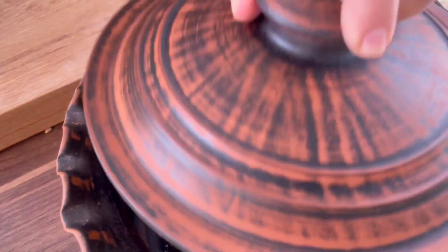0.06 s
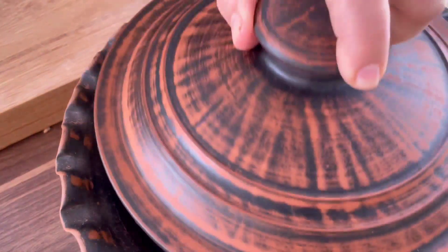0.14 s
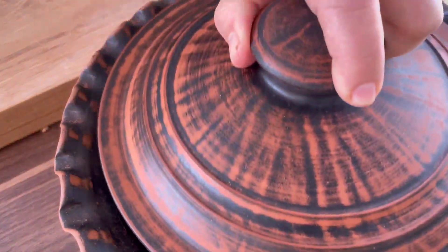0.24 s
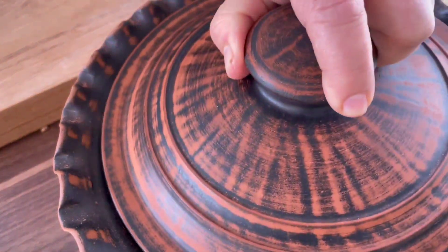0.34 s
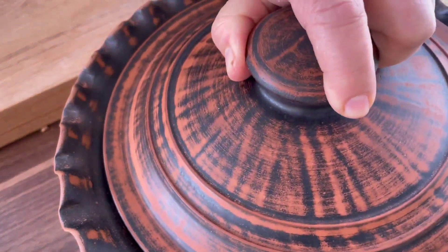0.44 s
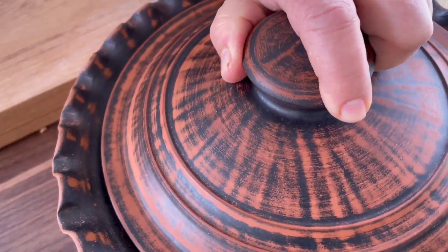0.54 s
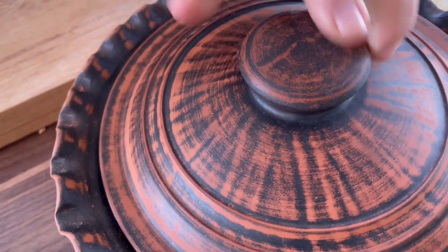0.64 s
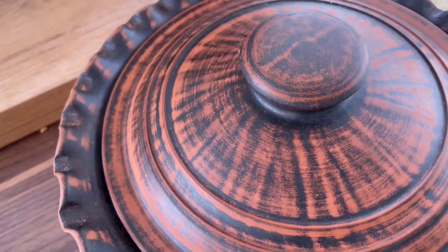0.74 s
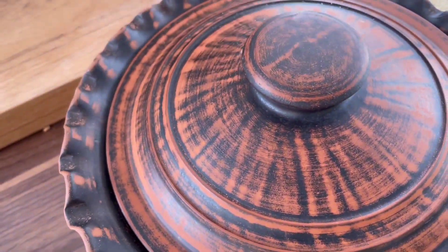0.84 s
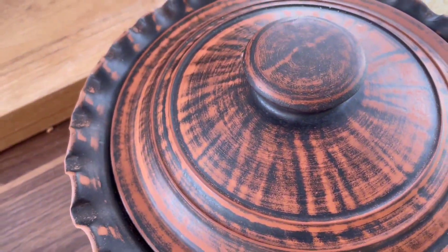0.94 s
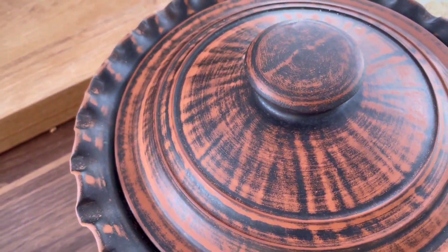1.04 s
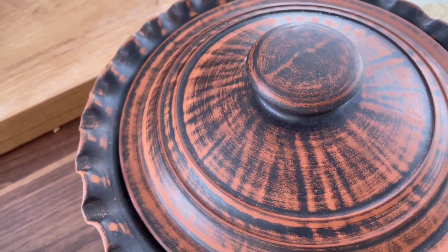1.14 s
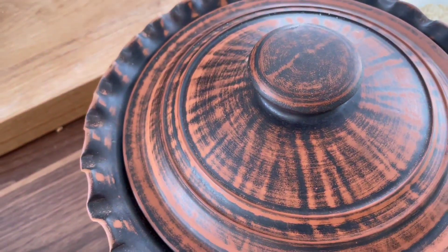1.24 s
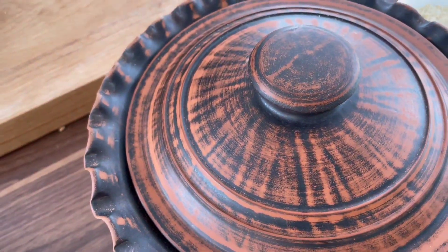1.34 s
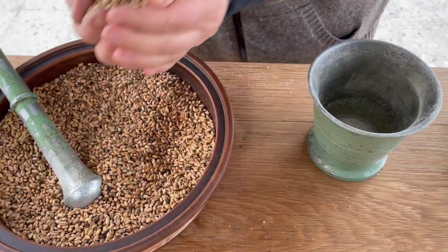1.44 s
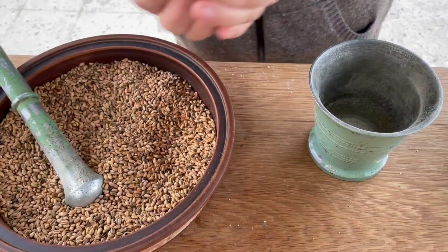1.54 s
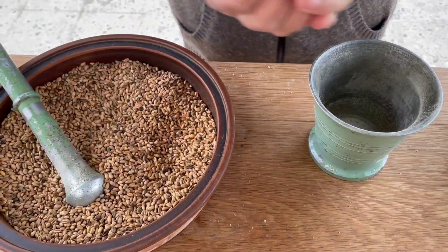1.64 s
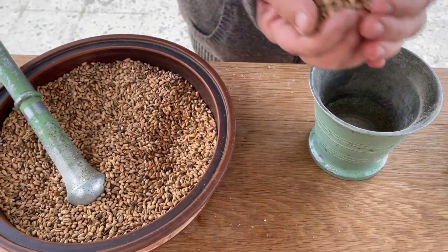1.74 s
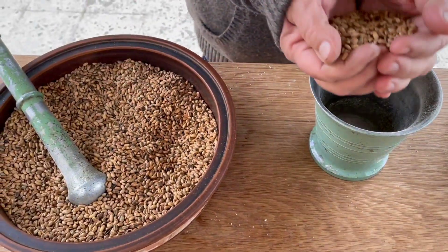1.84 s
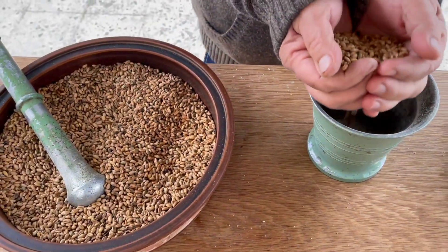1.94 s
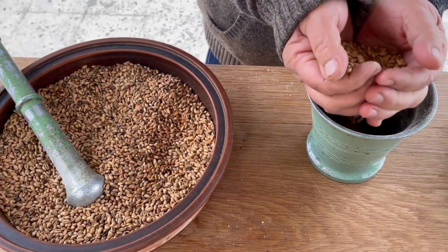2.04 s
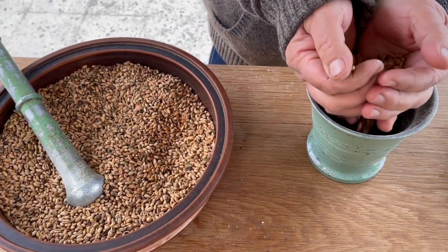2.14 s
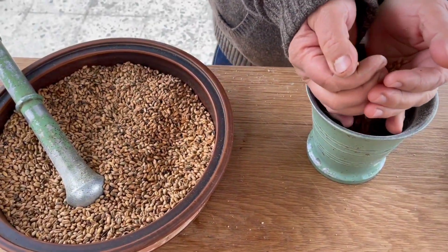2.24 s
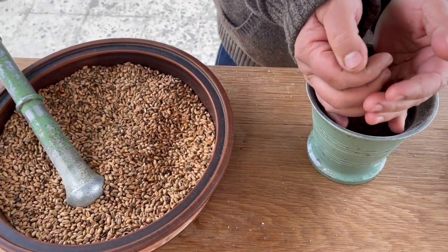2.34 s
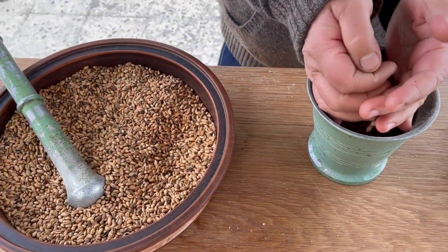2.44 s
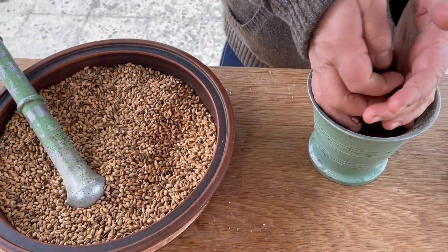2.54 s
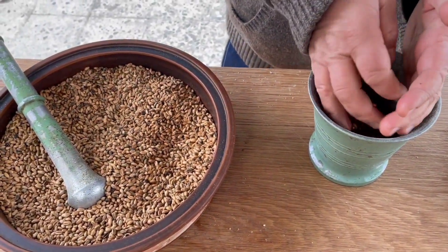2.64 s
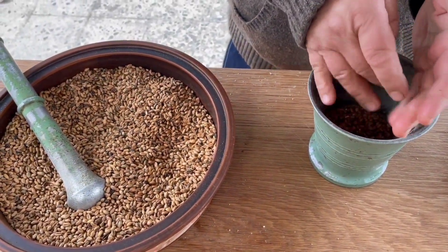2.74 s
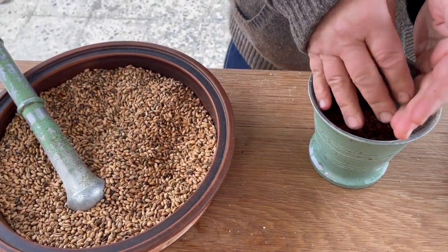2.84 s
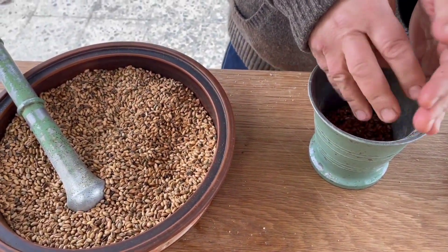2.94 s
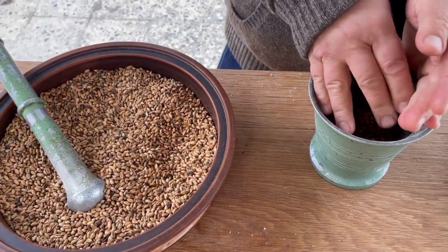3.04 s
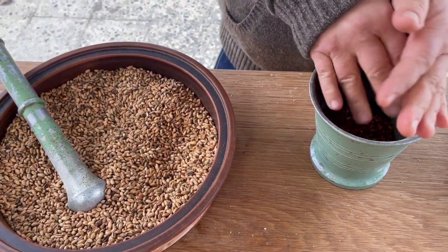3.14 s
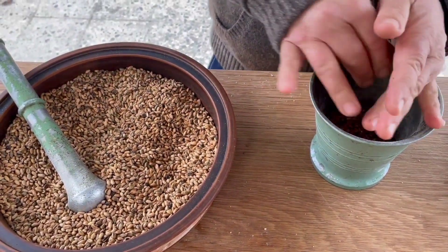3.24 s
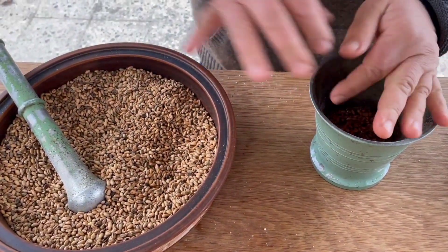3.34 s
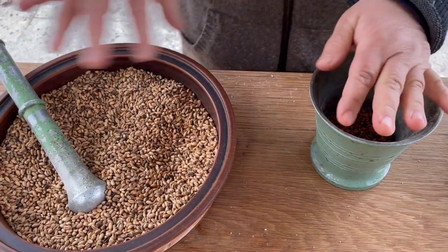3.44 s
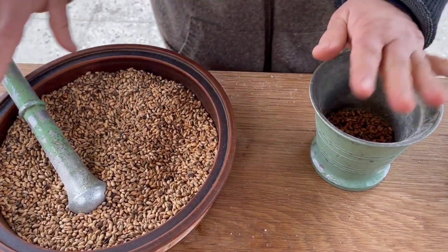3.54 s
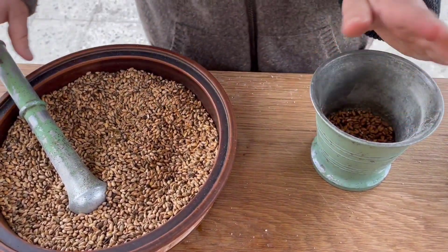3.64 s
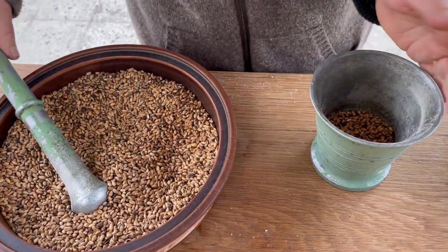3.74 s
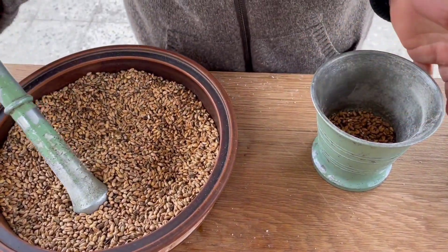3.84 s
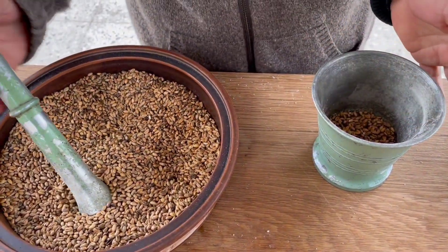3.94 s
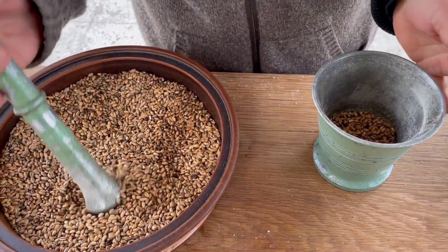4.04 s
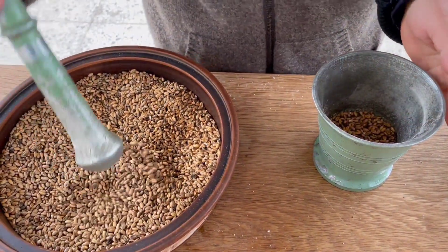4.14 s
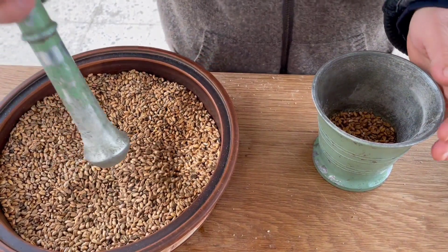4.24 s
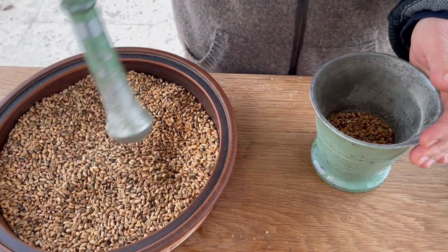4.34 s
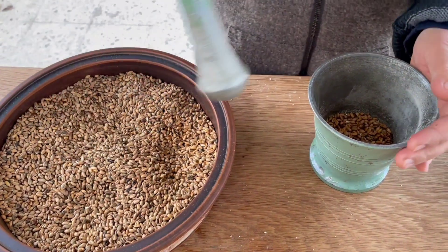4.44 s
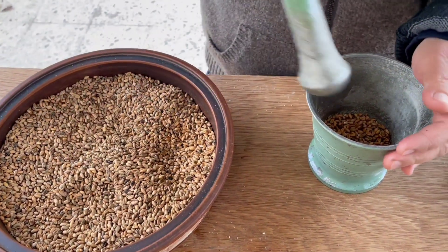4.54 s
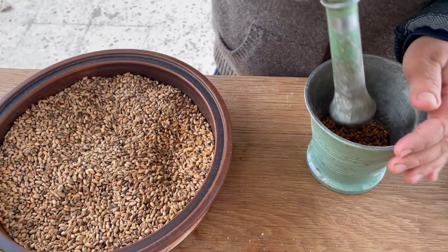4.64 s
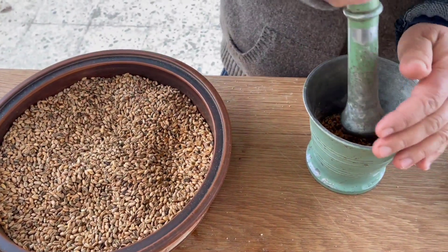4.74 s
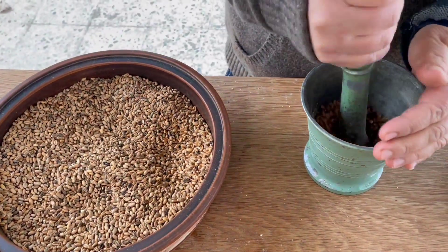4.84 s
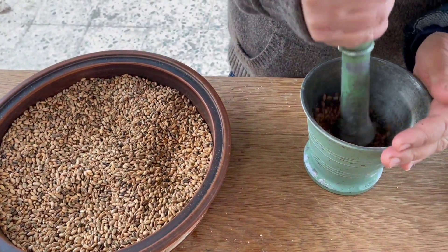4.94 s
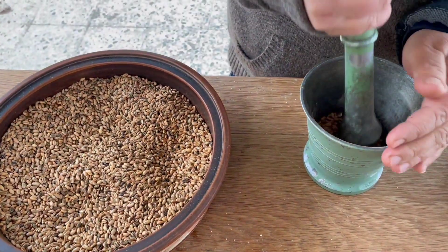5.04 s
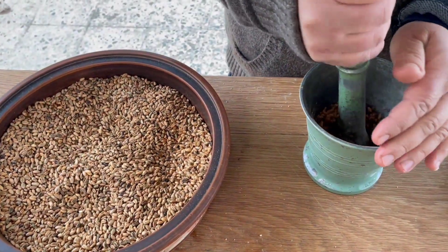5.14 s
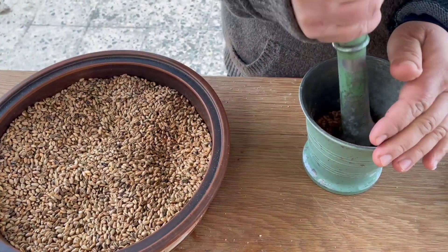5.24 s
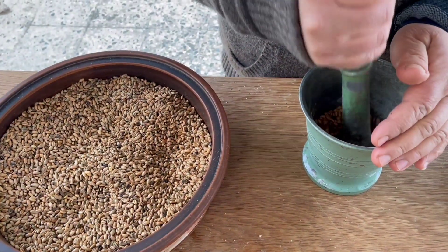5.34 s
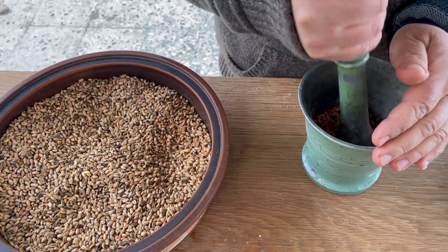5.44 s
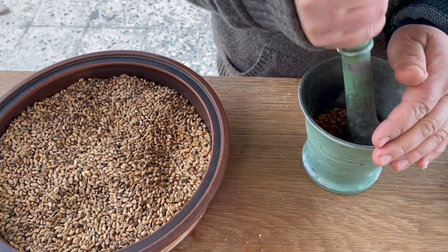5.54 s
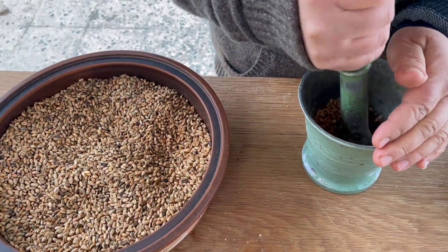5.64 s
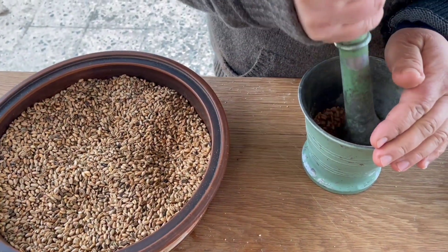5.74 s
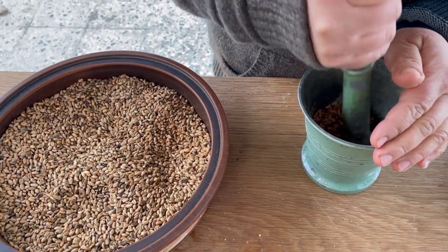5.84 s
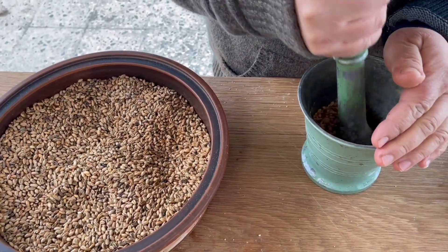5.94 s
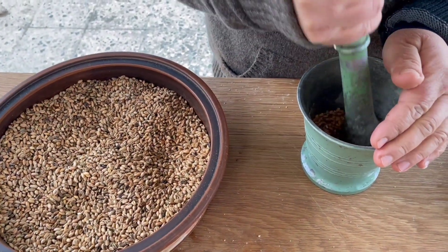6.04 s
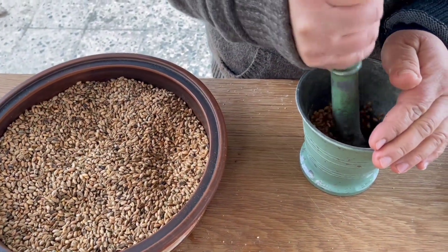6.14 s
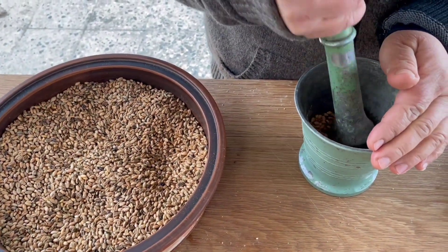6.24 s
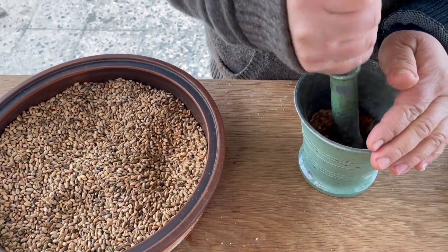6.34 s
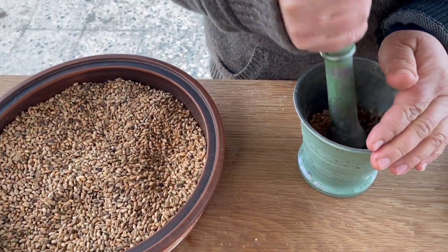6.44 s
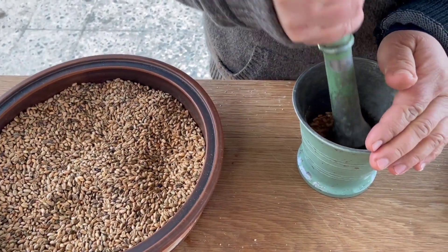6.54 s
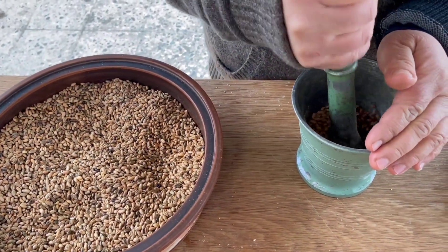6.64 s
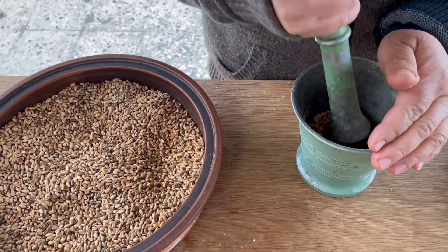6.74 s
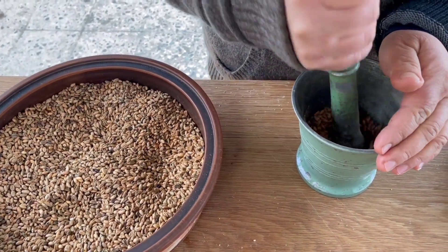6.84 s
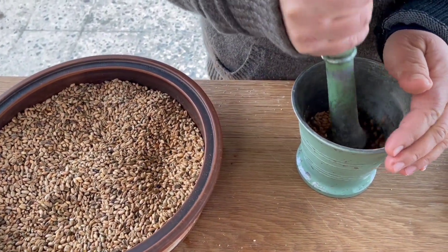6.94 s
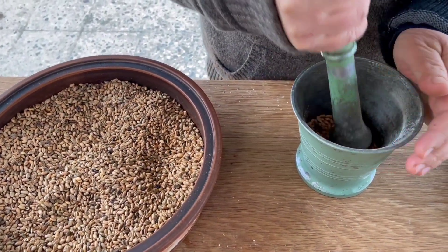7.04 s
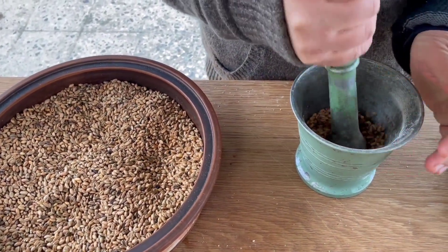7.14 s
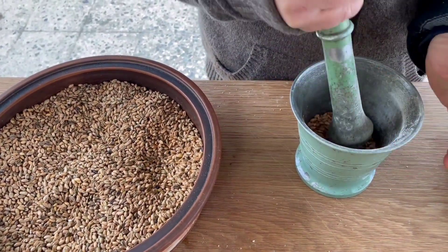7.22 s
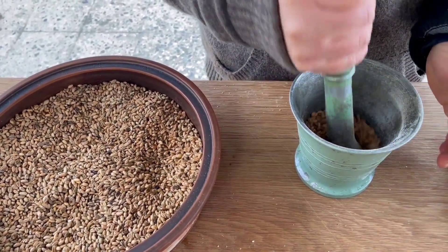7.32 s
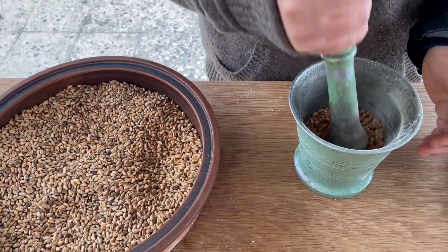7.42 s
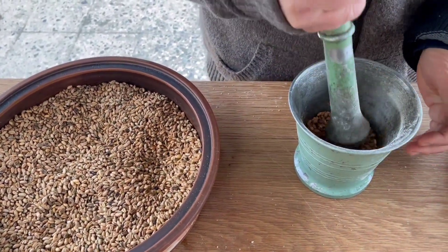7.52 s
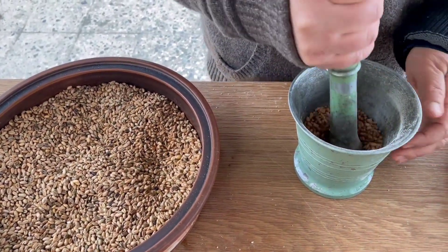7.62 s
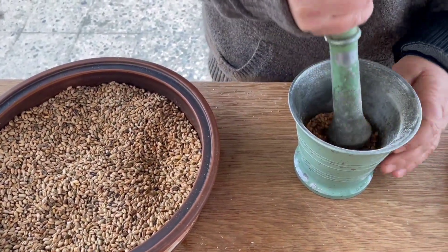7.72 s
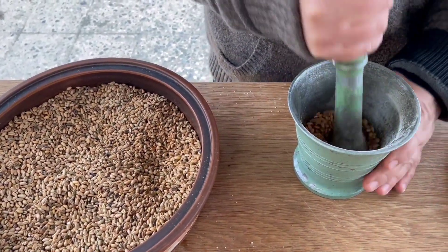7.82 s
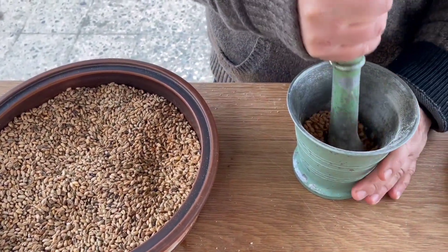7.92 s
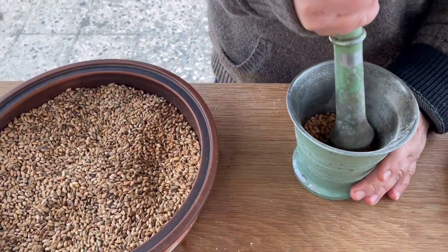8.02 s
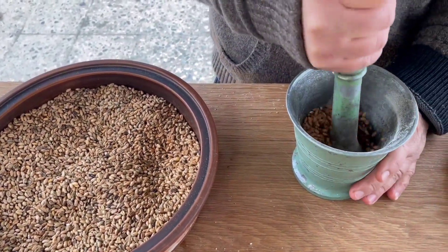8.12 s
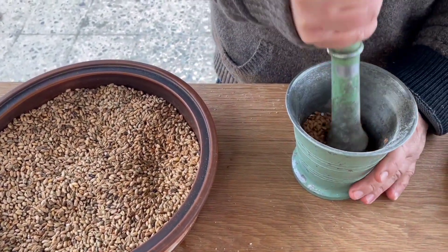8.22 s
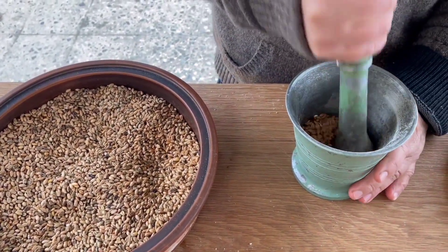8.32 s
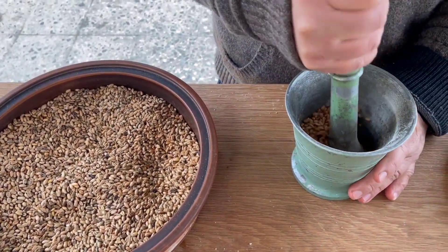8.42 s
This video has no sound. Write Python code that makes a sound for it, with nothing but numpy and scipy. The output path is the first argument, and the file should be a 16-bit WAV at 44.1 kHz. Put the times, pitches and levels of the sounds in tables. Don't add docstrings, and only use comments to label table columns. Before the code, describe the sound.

A clay lid clatters onto its pot, grain patters into a small metal mortar, then a pestle pounds steadily while birds sing outdoors.

```python
import sys
import numpy as np
from scipy import signal
from scipy.fft import rfft, irfft
from scipy.io import wavfile
from scipy.ndimage import uniform_filter1d

SR = 44100
rng = np.random.default_rng(int(sys.argv[2]) if len(sys.argv) > 2 else 0)


def boost(x):
    u = np.asarray(x, float) / 20
    return 10 ** u


def generate_wav(signal):
    frames = np.transpose(np.atleast_2d(signal))
    scaled = np.clip(frames, -1, 1) * 32767
    pcm = np.round(scaled).astype(np.int16)
    wavfile.write(sys.argv[1], SR, pcm)


N = 373960
TIME = np.arange(N) / SR

MORTAR_HZ = [1733, 3950, 9900, 10800, 11900, 12660, 12810, 13400, 13700, 14340]
# frequency in Hz, level in dB per Hz.
KERNEL = [(290, -40), (500, -3), (1020, -10), (2190, -5), (2570, -4), (3540, -5), (6610, -12.5),
          (8450, -20.5), (9770, -9), (13100, -0.5), (16000, -19.5)]
# frequency in Hz, level in dB per Hz.
WOOD = [(60, -21.5), (150, 4), (320, 7), (700, -7), (1100, -14), (1600, -34), (4000, -55.5)]


def evened(x):
    return x / np.sqrt(np.mean(x ** 2) + 1e-20)


def read(points, hz):
    f, value = np.transpose(points)
    return np.interp(np.log(hz + 1), np.log(f + 1), value)


def curve(rows, column=1):
    rows = np.array(rows)
    return np.interp(TIME, rows[:, 0], rows[:, column])


def add(mix, s, sound):
    part = mix[round(s * SR):][:len(sound)]
    part += sound[:len(part)]


def colour(x, spectrum):
    gain_db = np.maximum(read(spectrum, abs(np.fft.fftfreq(4096, 1 / SR))), -90)
    log_gain = np.log(boost(gain_db))
    taps = np.fft.ifft(np.exp(np.conj(signal.hilbert(log_gain)))).real[:2048]
    return signal.oaconvolve(x, taps / np.linalg.norm(taps))[:len(x)]


def ring(modes, contact_s, chatter_s=0.00028, detune=0.):
    t = np.arange(SR // 3) / SR
    hz, db, t60 = np.transpose(modes)[:, :, None]
    luck = rng.standard_normal((2, *hz.shape))
    db = db + 2.2 * luck[0]
    hz = hz * (1 + detune * luck[1])
    x = (boost(db - 60 * t / t60) * np.sin(2 * np.pi * hz * t)).sum(0)
    contact = rng.standard_normal(1500) * np.exp(-t[:1500] / chatter_s)
    x = signal.fftconvolve(x * (1 - np.exp(-t / contact_s)), contact)
    return x / abs(x).max()


def noise(spectrum, size, patchy_db, flicker_db):
    # frequency in Hz, coherence from -1 to 1.
    likeness = [(100, 0.92), (400, 0.47), (1500, 0.055), (12000, 0.24)]
    frames, hz = 4 * N // size + 5, np.fft.rfftfreq(size, 1 / SR)
    a, b, c, d, patches = rng.standard_normal((frames, len(hz), 5)).T
    patches = evened(uniform_filter1d(uniform_filter1d(patches, 7, 0), 9, 1))
    flicker = evened(uniform_filter1d(rng.standard_normal(frames), 3))
    same = np.clip(read(likeness, hz), -1, 1)[:, None]
    left = a + 1j * b
    right = same * left + np.sqrt(1 - same ** 2) * (c + 1j * d)
    level_db = read(spectrum, hz)[:, None] + patchy_db * patches + flicker_db * flicker
    z = np.array([left, right]) * boost(level_db)
    return evened(signal.istft(z, nperseg=size, noverlap=3 * size // 4)[1][:, :N])


def clicks(per_s, spread_db):
    size = boost(spread_db * np.minimum(rng.exponential(1, N), 4)) * rng.choice([-1., 1.], N)
    return evened(size * (rng.random(N) < per_s / SR))


def metal(damping, tilt):
    # level in dB, t60 in seconds.
    mortar = [(-31, 0.63), (-30, 0.3), (-19, 0.23), (-6, .08), (-3, 0.08), (14, 0.16), (-8, 0.088),
              (-8, 0.062), (-8, 0.12), (-4, 0.12)]
    return [(hz, db * tilt, t60 * damping) for hz, (db, t60) in zip(MORTAR_HZ, mortar)]


def pestle():
    # time in seconds, thud peak in dB, crunch in dB,
    # mortar ring in dB, pitch of the thud in Hz.
    blows = [(4.879, -13, -27.5, -21.5, 355), (5.141, -15, -31.5, -29, 329), (5.393, -18, -32, -25, 268),
             (5.633, -13.5, -31.5, -34, 329), (5.887, -15.5, -28.5, -30, 261),
             (6.129, -13, -29.5, -31, 250), (6.376, -13.5, -30.5, -16, 271), (6.636, -13, -31, -21.5, 269),
             (6.885, -12, -29.5, -24, 259.7), (7.124, -20.5, -34.5, -23.5, 332),
             (7.394, -17.5, -30.5, -20, 335), (7.655, -16, -30.5, -23.5, 253),
             (7.903, -16, -30, -15.5, 280), (8.162, -13, -29, -22.5, 201), (8.405, -11.5, -27, -22.5, 350)]
    touches = [4.839, 5.104, 5.352, 5.595, 5.855, 6.095, 6.345, 6.597, 6.847, 7.087, 7.352, 7.608, 7.859,
               8.124, 8.376]
    # time in seconds, peak in dB, low ring in Hz,
    # upper ring in Hz, upper over low in dB.
    feet = [(4.88, -14, 579, 907, 1), (5.142, -25.5, 530, 880, 3), (5.391, -22.5, 503, 895, 1),
            (5.633, -23.5, 646, 890, 1), (5.886, -20, 571, 830, 0), (6.126, -20, 505, 810, 0.5),
            (6.375, -18, 649, 880, -1.5), (6.637, -20, 558, 950, 2), (6.885, -16, 563, 966, 1),
            (7.126, -27, 640, 958, -1), (7.389, -21, 623, 956, 2.5), (7.648, -25, 635, 872, 0),
            (7.902, -23.5, 573, 867, 0), (8.157, -11, 727, 882, -0.5), (8.403, -14, 580, 852, 0)]
    # frequency in Hz, level in dB, t60 in seconds.
    table = [(130.9, -15.5, 0.46), (173.3, -11.5, 0.25), (259, -5.5, 0.13), (355.7, -3.5, 0.087)]
    # time in seconds, level in dB.
    hums = [(4.885, -40), (5.15, -36), (5.89, -31.5), (6.135, -32), (6.385, -33.5), (7.395, -32.5),
            (8.165, -39), (8.41, -38)]
    # time in seconds, level in dB.
    bursts = [(4.879, -34.5), (5.129, -39), (5.392, -34), (5.888, -22.5), (6.127, -28), (6.378, -23),
              (6.386, -18), (6.631, -35), (6.638, -24.5), (6.886, -24.5), (7.125, -27.5), (7.389, -29),
              (7.65, -29), (7.878, -36), (7.902, -32), (8.145, -34), (8.159, -40), (8.402, -33),
              (8.408, -23), (8.418, -28.5)]
    # frequency in Hz, level in dB per Hz.
    grind_spectrum = [(300, -25), (550, 0), (1000, -1), (1350, -14), (3000, -36)]
    hand_off_s, held_damping = 7.0, 0.3
    foot_t60 = 0.042
    cup_air = (1493, -6.5, 0.023)
    out, push, rub, snaps, grind = np.zeros((5, N))
    for start, (s, db, crunch_db, ring_db, hz) in zip(touches, blows):
        depth = (TIME - start) / (s - start)
        push_db = crunch_db - 14.0 + 10.5 * np.minimum(depth, 1) - 1500 * np.maximum(TIME - s, 0)
        push += boost(push_db) * np.clip(6 * depth, 0, 1)
        rise_db, fall_db = 670 * np.maximum(s + 0.0036 - TIME, 0), 294 * np.maximum(TIME - s - .004, 0)
        rub += boost(db - 12.0 - rise_db - fall_db)
        add(out, s, boost(db - 8.0) * ring(table, 0.009, detune=0.034))
        add(out, s, boost(db - 6.0) * ring([(hz, 0, 0.081)], 0.015))
        damping = 0.96 if s > hand_off_s else held_damping
        add(out, s, boost(ring_db - 0.5) * ring(metal(damping, 0.9), 0.00033))
    for s, db, low_hz, upper_hz, upper_db in feet:
        base = [(low_hz, 0, foot_t60), (upper_hz, upper_db, foot_t60), cup_air, (MORTAR_HZ[0], -32, .25)]
        add(out, s - .003, boost(db - 2.5) * ring(base, .0025, chatter_s=.0001))
        rise_db, fall_db = 1000 * np.maximum(s + .005 - TIME, 0), 900 * np.maximum(TIME - s - .005, 0)
        grind += boost(db - 15. - rise_db - fall_db)
    for s, db in hums:
        add(out, s, boost(db) * ring([(467, 0, 0.25)], 0.0048, detune=0.0093))
    for s, db in bursts:
        add(snaps, s, boost(db + 18.5) * np.array([1, -.5, .3]))
    crunch = colour(push * clicks(9000, 3.9) + snaps, KERNEL)
    shudder = colour(rub * rng.standard_normal(N), WOOD)
    return out + crunch + shudder + colour(grind * clicks(2500, 3.), grind_spectrum)


def lift():
    lift_s, lift_db = 4.013, -28
    heap = boost(lift_db - 11.0 - 330 * abs(TIME - lift_s)) * rng.standard_normal(N)
    heap[round(lift_s * SR)] += boost(lift_db + 20)
    return colour(heap, [(300, -18), (700, 5.5), (1000, -10.5), (2000, -15.0), (4000, -69.5)])


def lid():
    # time in seconds, peak in dB, low clay rings in dB, high in dB.
    knocks = [(0.145, -4.5, -16.5, -16), (0.156, -6, -35, -43), (0.187, -6.5, -17.5, -27),
              (0.21, -31, -40, -31), (0.224, -23.5, -40, -29.5), (0.275, -15.5, -52, -53),
              (0.296, -8, -19, -46), (0.34, -17.5, -28, -45), (0.364, -3.5, -10.5, -28.5),
              (0.388, -26, -33, -36), (0.414, -17, -42, -45)]
    # time in seconds, peak in dB, pitch in Hz.
    bumps = [(.6, -36.5, 720), (0.642, -31, 297), (0.699, -14, 328), (.706, -11, 200), (0.758, -19.5, 277),
             (.772, -20.5, 130), (0.8, -28, 256), (.85, -30.5, 109), (.912, -35.5, 100), (1.007, -13, 600),
             (1.014, -16, 241), (1.024, -15.5, 567), (1.04, -25, 329), (1.06, -29, 470),
             (1.332, -31.5, 293), (1.364, -29, 600)]
    # frequency in Hz, level in dB, t60 in seconds.
    clay = [(650, -2, .22), (754, -11, .08), (888, 1, .12), (1087, -2, .07), (1160, -8, .07),
            (1410, -11, .22), (1604, 0, .09), (1733, -8, .15), (2326, -15, .08)]
    # frequency in Hz, level in dB, t60 in seconds.
    rim = [(2850, -7, .05), (2965, -2, .12), (3150, -8, .05), (3400, -2, .09), (3590, -5, .07),
           (3850, -6, .04), (4175, -3, .07), (4345, -7, .1), (4535, -1, .1), (4860, -7, .05),
           (5600, -14, .05)]
    # frequency in Hz, level in dB, t60 in seconds.
    board = [(123.7, -16, 0.38), (164.6, -8, 0.11), (352, -7.5, 0.0306), (450, -7.5, 0.014)]
    first_thump_hz, sink_hz_per_s = 317.8, 568
    muted_clay_db, muted_rim_db = -22, -46
    gripped_until_s = .18
    swish_end_s, swish_db = 0.166, -54.5
    out, grate, rub, bite = np.zeros((4, N))
    first_s, last_s = knocks[0][0], knocks[-1][0]
    strikes = [(*row, first_thump_hz - sink_hz_per_s * (row[0] - first_s)) for row in knocks]
    strikes += [(s, db, db + muted_clay_db, db + muted_rim_db, hz) for s, db, hz in bumps]
    for s, db, clay_db, rim_db, hz in strikes:
        seated_db = -6 * (s > last_s)
        modes = clay
        if s > last_s:
            modes = clay[:2]
        elif s < gripped_until_s:
            modes = clay[:5]
        thump = (hz, 0, min(.13, 24 / hz))
        add(out, s, boost(db) * ring(board + [thump], 0.0015, chatter_s=0.00043))
        add(out, s, boost(clay_db - 1.5) * ring(modes, 0.00012, chatter_s=.0003, detune=.006))
        add(out, s, boost(rim_db + 3) * ring(rim, .0001, chatter_s=.006, detune=.004))
        after = np.maximum(TIME - s, 0)
        grate += (boost(rim_db - 13.0) + boost(clay_db - 15.0)) * boost(-900 * after) * (after > 0)
        add(bite, s, boost([clay_db + 9.5 + seated_db]))
        rub += boost(db - 14.5 + seated_db - 426 * after) * (after > 0)
    grate = colour(grate * rng.standard_normal(N) + bite,
                   [(300, -15.5), (900, 11.5), (2200, -11.0), (4500, -6.0), (5500, -46), (9000, -37)])
    swish = boost(swish_db) * (TIME < swish_end_s) * rng.standard_normal(N)
    out = signal.sosfilt(signal.butter(4, 5200, fs=SR, output="sos"), out)
    out += colour(swish, [(2500, -27), (5500, -4), (9500, 9), (11000, -39)])
    return out + grate + colour(rub * rng.standard_normal(N), WOOD)


def grain():
    # time in seconds, patter in dB.
    pour = [
        (1.96, -68),
        (1.99, -58),
        (2.08, -55),
        (2.24, -44.5),
        (2.4, -56),
        (2.8, -64.5),
        (3.17, -61),
        (3.4, -73),
    ]
    # time in seconds, peak in dB.
    drops = [
        (1.983, -36.5),
        (2.829, -23.5),
        (3.043, -31),
    ]
    # start in seconds, length in seconds, patter in dB.
    rubs = [
        (0, 0.15, -69),
        (0.206, 0.011, -41.5),
        (0.337, 0.1, -62),
        (0.568, 0.1, -59.5),
        (1.324, 0.056, -55),
        (3.326, 0.021, -57.5),
        (3.94, 0.24, -56.5),
        (8.417, .1, -46),
        (4.712, 4.5, -61.5),
    ]
    # frequency in Hz, level in dB, t60 in seconds.
    bare_modes = [(3950, -17, .12), (7600, -12, .08), (10000, -5, .05), (11950, -2, .055), (12700, -4, .04),
                  (13300, 0, .07), (13650, -1, .08)]
    bare_s, filled_s = 1.984, 0.15
    level = boost(curve(pour)) * (TIME > pour[0][0]) * (TIME < pour[-1][0])
    for s, length, db in rubs:
        outside_s = np.maximum(np.maximum(s - TIME, TIME - s - length), 0)
        level += boost(db - 454 * outside_s)
    out = colour(level * clicks(6000, 4.0), KERNEL)
    bare = boost(19.0 - 12 * (TIME - bare_s) / filled_s) * (TIME > bare_s)
    ping = ring(metal(0.32, 0.98), .0001, chatter_s=.0001)
    out += signal.oaconvolve(level * bare * clicks(900, 3.5), ping / np.linalg.norm(ping))[:N]
    for s, db in drops:
        add(out, s, boost(db) * ring(bare_modes, .0001, chatter_s=.0002))
    return out


def ports(x, lean):
    # frequency in Hz, side minus mid in dB.
    side_spectrum = [(60, -17), (130, -24), (290, -13.5), (640, 1), (1410, -5), (3100, -15), (6820, 7.5),
                     (15000, -9)]
    flip_hz = [700, 3000, 8400]
    hz = np.fft.rfftfreq(N, 1 / SR)
    lead = (-1.) ** np.searchsorted(flip_hz, hz)
    bounce = rng.standard_normal(900) * boost(-60 * np.arange(900) / SR / .02)
    scattered = boost(-3.) * signal.oaconvolve(x, bounce / np.linalg.norm(bounce))[:N]
    shifted = 1j * lead * boost(read(side_spectrum, hz)) * rfft(0.83 * x + scattered)
    side = irfft(shifted, N) + lean * x
    return x + side * np.array([[1], [-1]])


def whistle(start, length, from_hz, to_hz, db, slide_s, tremble_hz=22):
    attack_s, release_s, swell_db = 0.0084, 0.018, 1
    t = np.arange(0, length, 1 / SR)
    tremble = evened(uniform_filter1d(rng.standard_normal(len(t)), 300))
    hz = from_hz + (to_hz - from_hz) * np.minimum(t / slide_s, 1)
    hz = uniform_filter1d(hz, 300, mode="nearest")
    turns = np.cumsum(hz + tremble_hz * tremble) / SR
    shape = np.minimum(np.minimum(t / attack_s, (length - t) / release_s), 1) * boost(swell_db * t / length)
    return start, np.sqrt(2) * boost(db) * shape * np.sin(2 * np.pi * turns)


def trill(start, end, low_hz, high_hz, per_s, db):
    t = np.arange(0, end - start, 1 / SR)
    jitter = .04 * evened(uniform_filter1d(rng.standard_normal(len(t)), 400))
    beat = (t * per_s + jitter) % 1
    sweep = np.minimum(beat / 0.45, 1)
    swell = np.sin(np.pi * sweep)
    turns = np.cumsum(low_hz + (high_hz - low_hz) * sweep) / SR
    return start, boost(db + 9.5) * swell * np.sin(2 * np.pi * turns)


def yard(x):
    t = np.arange(SR) / SR
    taps = rng.choice([-1., 1.], (2, SR)) * (rng.random((2, SR)) < .05)
    taps = taps * boost(-60 * t / .8) * (t > .006)
    return signal.fftconvolve(x[None], taps / np.linalg.norm(taps[0]), axes=1)[:, :N]


def birds():
    # start in seconds, length in seconds, from Hz, held Hz, dB.
    flute = [(1.215, 0.115, 2050, 2045, -45), (1.1, 0.138, 1740, 1715, -54), (1.06, 0.039, 1870, 1860, -55),
             (.87, .06, 2100, 2300, -55), (0.9, .07, 2200, 2150, -55), (1.503, 0.23, 2080, 2290, -48),
             (1.72, 0.2, 2250, 2040, -49), (1.58, 0.13, 2500, 2620, -54), (1.375, 0.047, 2850, 2880, -51),
             (1.08, 0.084, 4150, 4200, -59), (1.2, .1, 4380, 4400, -60), (3.32, .13, 2450, 2200, -60),
             (2.52, 0.11, 3050, 3150, -55), (2.159, 0.24, 1900, 1735, -46), (2.219, 0.13, 2300, 2285, -48),
             (2.58, 0.091, 1980, 2430, -41), (2.851, 0.07, 2050, 1750, -42),
             (3.073, .18, 2180, 1960, -37.5), (3.32, 0.175, 2150, 1960, -39.5),
             (3.717, 0.147, 2750, 1770, -41.5), (4.176, 0.077, 2380, 2620, -42.5),
             (4.224, 0.091, 2780, 2070, -41.5), (4.482, 0.067, 2280, 2070, -41.5),
             (5.046, 0.14, 2110, 2060, -51), (5.098, 0.25, 4650, 4400, -58), (5.368, 0.11, 2600, 2830, -52),
             (5.26, .1, 1700, 2050, -53), (2.86, 0.087, 2500, 2150, -56), (5.73, 0.11, 2050, 1790, -50),
             (5.899, 0.093, 2900, 2650, -49), (5.52, 0.206, 2440, 2330, -54),
             (5.957, 0.183, 2030, 2060, -51), (7.259, 0.097, 1910, 2150, -43),
             (7.432, 0.088, 1990, 1787, -43.5)]
    # start in seconds, length in seconds, from Hz, to Hz, dB.
    slides = [(1.288, 0.12, 7530, 8000, -57.5), (1.48, 0.069, 7740, 7700, -61.5),
              (1.9, 0.063, 2020, 2396, -52), (1.097, 0.09, 1910, 2500, -54),
              (2.466, 0.031, 2600, 2830, -43.5), (2.488, 0.099, 2825, 1943, -37.5),
              (2.912, 0.04, 1750, 1470, -47.5), (3.589, 0.069, 2768, 2300, -40),
              (4.875, 0.072, 5760, 4970, -47.5), (5.016, 0.091, 5970, 4710, -48.5),
              (5.208, 0.091, 2564, 2260, -49), (5.36, 0.12, 6300, 6400, -61), (5.149, .09, 2056, 2270, -53),
              (6.222, 0.089, 2545, 1850, -48), (6.64, 0.12, 2485, 2087, -47.5),
              (7.585, 0.045, 2620, 3240, -48.5), (7.687, 0.071, 2392, 1866, -38.5),
              (7.861, 0.22, 2887, 2145, -39.5)]
    # start in seconds, end in seconds, low Hz, sweeps per second, dB.
    trills = [
        (2.114, 3.127, 4620, 12.4, -58.5),
        (6.07, 7.09, 4600, 11.6, -58),
    ]
    buzzes = [
        (2.77, 2.86, 2250, 62, -45),
        (3.655, 3.725, 2196, 60, -40.5),
        (7.625, 7.68, 1722, 56.7, -41),
    ]
    # length in seconds, slide in seconds, end pitch as a share of the top, level in dB.
    thin = [(4.045, 7350), (4.315, 7150), (4.6, 7000)]
    thin_shape = (0.21, .21, .9, -56)
    peeps = [(2.0, 4650), (2.43, 4700), (2.86, 4700), (3.27, 4750), (3.72, 4700), (4.2, 4700), (4.65, 4650)]
    peep_shape = (.09, .09, .955, -57)
    scoops = [(7.4, 6800), (7.72, 6850), (7.95, 6600)]
    scoop_shape = (.17, .07, .88, -60)
    dives = [(2.43, 5000), (3.89, 5000), (4.425, 5700), (4.625, 5600), (6.3, 7500)]
    dive_shape = (.06, .06, .74, -59)
    hooks = [(3.05, 3600), (3.48, 3600), (3.93, 3600)]
    hook_shape = (.11, .03, .83, -60)
    chips = [(1.62, 6000), (1.73, 5700), (1.87, 7700), (1.93, 7300), (1.96, 6600), (2.03, 6400),
             (2.44, 7200), (2.46, 5200)]
    chip_shape = (.05, .05, .8, -56)
    chatter = [(.475, 4400), (.545, 4300), (.61, 4100), (.68, 4300), (.74, 4200), (.83, 4300)]
    chatter_shape = (.04, .03, .82, -57)
    # time in seconds, left minus right in dB.
    bearing = [(0, 1), (1.7, 0), (3.2, -2.5), (5.8, 2), (7.3, -1.5), (8.48, -2.5)]
    far_below_db, far_dry_db, echo_db = -47.5, -6, 1.
    pure_hz, rasp_hz = 22, 350
    near, far = np.zeros((2, N))
    notes = [(*row, .065) for row in flute] + [(*row, row[1]) for row in slides]
    for note in notes:
        add(far if note[4] < far_below_db else near, *whistle(*note))
    kinds = [(thin, thin_shape, pure_hz), (peeps, peep_shape, pure_hz), (scoops, scoop_shape, pure_hz),
             (dives, dive_shape, pure_hz), (hooks, hook_shape, pure_hz),
             (chips, chip_shape, rasp_hz), (chatter, chatter_shape, rasp_hz)]
    for calls, (length, slide_s, share, db), tremble_hz in kinds:
        for start, hz in calls:
            add(near, *whistle(start, length, hz, share * hz, db, slide_s, tremble_hz))
    for rows, sweep_hz in [(trills, 560), (buzzes, 690)]:
        for start, end, hz, per_s, db in rows:
            add(near, *trill(start, end, hz, hz + sweep_hz, per_s, db))
    pan = boost(curve(bearing) * np.array([[.5], [-.5]]))
    echo = boost(echo_db) * yard(near + boost(1.5) * far)
    return boost(-1.5) * (near + boost(far_dry_db) * far + echo) * pan


def chorus():
    # frequency in Hz, width in Hz, level in dB.
    bands = [(2300, 200, -33.5), (4460, 700, 1), (5190, 184, -5), (6550, 3300, -4)]
    # time in seconds, level in dB.
    strength = [(0.0, -48), (1.3, -62.5), (1.89, -54), (2.08, -49), (2.76, -59), (3.75, -62.5),
                (4.08, -53.5), (8.48, -56)]
    hz = np.geomspace(800, 12000, 60)
    power = sum(boost(db) / (1 + (2 * (hz - f) / width) ** 4) for f, width, db in bands)
    spectrum = list(zip(hz, 20 * np.log10(power)))
    return boost(curve(strength) - 3) * noise(spectrum, size=2048, patchy_db=4.5, flicker_db=1.5)


def wind():
    # time in seconds, level in dB.
    strength = [(0.0, -57), (0.16, -62), (0.31, -37), (0.52, -41), (0.94, -35.5), (1.13, -43.5),
                (1.49, -48.5), (1.68, -54.5), (1.94, -64.5), (2.17, -53), (5.36, -35), (5.6, -41),
                (6.0, -31), (6.35, -43.5), (7.04, -32), (7.53, -41.5), (7.96, -36), (8.48, -36)]
    # frequency in Hz, level in dB per Hz.
    rumble_spectrum = [(12, -47), (20, -21.5), (48, 5.5), (119, -0.5), (195, -8.5), (308, -15),
                       (564, -29.5), (1000, -42), (1300, -86)]
    # time in seconds, peak in dB, left minus right in dB.
    pops = [(2.169, -32, 1), (2.639, -44, 7), (2.99, -35.5, 0.5), (3.179, -33.5, 2), (3.379, -35, 7),
            (3.869, -34, 4.0), (4.184, -22, 0), (4.317, -34, 0.0), (4.399, -26.5, 0), (4.44, -25, -2),
            (4.585, -30, -1), (4.807, -25, -1), (4.829, -21, 0), (5.01, -29, -1), (5.083, -32, 0.0),
            (5.266, -24, 0.0), (5.439, -22, -0.5), (5.509, -32, 0), (5.715, -22.5, 0), (5.765, -31.5, -2),
            (5.826, -22, 0), (5.971, -26, 0.0), (6.039, -24, -1), (6.069, -25, 0.0), (6.56, -28.5, 0),
            (6.792, -27.5, 0), (6.83, -32, -0.5), (6.998, -39, -0.5), (7.049, -26.5, -1.0),
            (7.105, -24, -4), (7.194, -25, 1), (7.759, -35, -0.5), (7.818, -24, -6), (7.958, -23.5, 2),
            (8.366, -30, -6)]
    # frequency in Hz, level in dB per Hz.
    pop_spectrum = [(30, -26), (90, 3), (250, 0), (500, -12), (800, -34.5), (1500, -56)]
    rumble = boost(curve(strength) + 3) * noise(rumble_spectrum, size=1024, patchy_db=2.5, flicker_db=1.6)
    thumps = np.zeros((2, N))
    for s, db, pan_db in pops:
        both_db = db + 19.5 + np.array([pan_db, -pan_db]) / 2
        thumps[:, round(s * SR)] = rng.choice([-1, 1]) * boost(both_db)
    return rumble + np.array([colour(port, pop_spectrum) for port in thumps])


def background():
    # frequency in Hz, level in dB per Hz.
    air_spectrum = [(180, -37), (300, -3.5), (1390, -11), (2170, -4), (2880, -10), (4670, -12.5),
                    (7820, -33.5), (8940, -23), (12700, -22.5), (14700, -30), (16000, -60)]
    # frequency in Hz, level in dB per Hz.
    drone_spectrum = [(30, -19), (60, 5.5), (100, -14), (180, -50), (400, -69)]
    air = boost(-52) * noise(air_spectrum, size=1024, patchy_db=3.5, flicker_db=.6)
    return air + boost(-49 - 4) * noise(drone_spectrum, size=2048, patchy_db=5, flicker_db=3.0)


def scene():
    near = ports(lid(), 0.13) + ports(pestle() + lift() + grain(), -0.09)
    return near + birds() + chorus() + wind() + background()


def dropouts(x):
    # frequency in Hz, share from 0 to 1.
    silent = [(4900, 0), (5600, .08), (7200, .12), (8300, .5), (9100, .4), (9900, 0), (14300, 0),
              (15300, .3), (15900, .98)]
    bins = 24
    hz, _, z = signal.stft(x, SR, "cosine", nperseg=2048)
    band = np.arange(len(hz)) // bins
    power = np.add.reduceat(abs(z) ** 2, np.arange(0, len(hz), bins), axis=0)
    whim = evened(uniform_filter1d(rng.standard_normal(power.shape), 5, 1))
    power = power * boost(14 * whim)
    rank = power.argsort(1).argsort(1) / power.shape[1]
    heard = rank >= read(silent, hz[bins // 2::bins])[:, None]
    return signal.istft(z * heard[band], SR, "cosine", nperseg=2048)[1][:N]


def low_pass(x):
    return signal.sosfilt(signal.butter(12, 16650, fs=SR, output="sos"), x)


def record(dry):
    gap_start_s, gap_end_s, gap_db = 1.397, 1.44, -3
    gap = uniform_filter1d(1. * (TIME > gap_start_s) * (TIME < gap_end_s), 200)
    thin = boost(gap_db) * signal.sosfilt(signal.butter(4, 500, "high", fs=SR, output="sos"), dry)
    bass_cut = signal.butter(4, 40, "high", fs=SR, output="sos")
    cut = signal.sosfilt(bass_cut, dry + gap * (thin - dry))
    limited = cut / (1 + abs(cut / .92) ** 6) ** (1 / 6)
    left, right = signal.oaconvolve(limited, signal.firwin(255, 15900, fs=SR)[None], "same")
    mid, side = dropouts((left + right) / 2), (left - right) / 2
    return low_pass(np.array([mid + side, mid - side]))


dry = scene()
out = record(dry)
generate_wav(out)
```